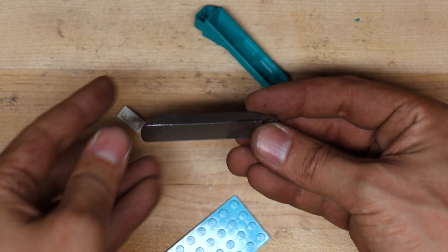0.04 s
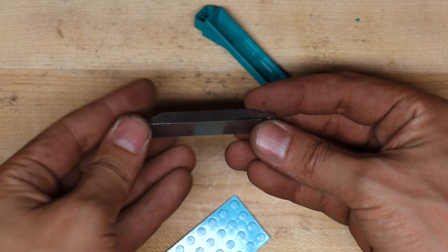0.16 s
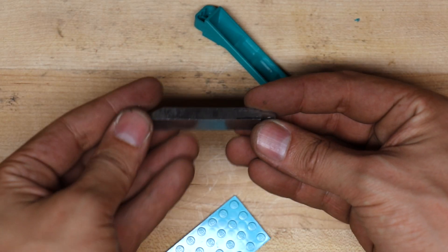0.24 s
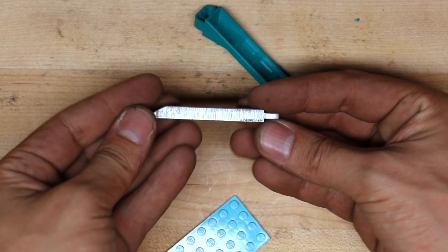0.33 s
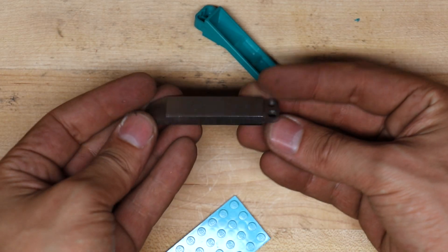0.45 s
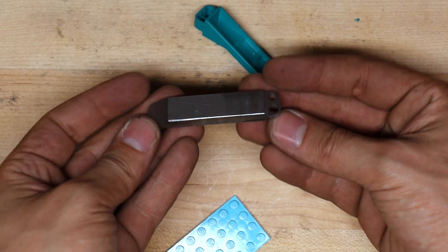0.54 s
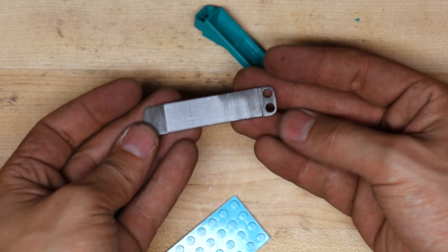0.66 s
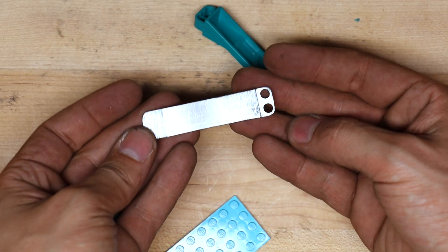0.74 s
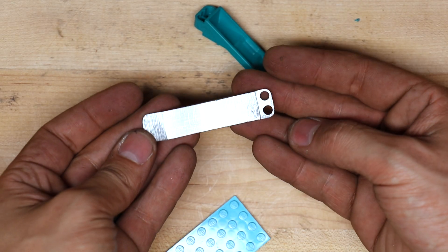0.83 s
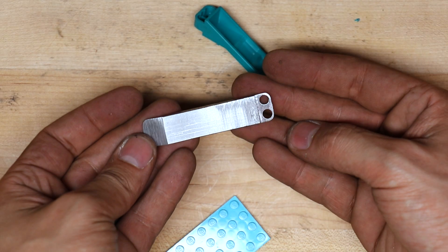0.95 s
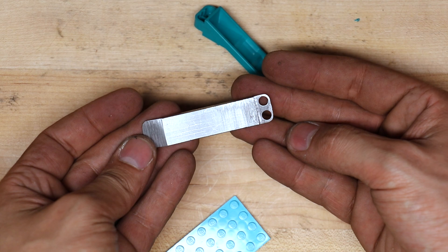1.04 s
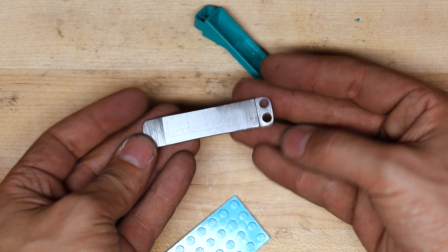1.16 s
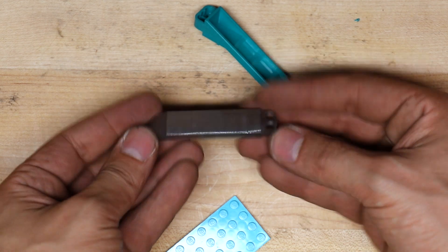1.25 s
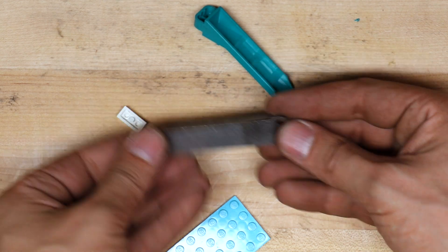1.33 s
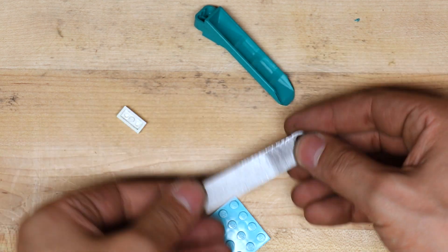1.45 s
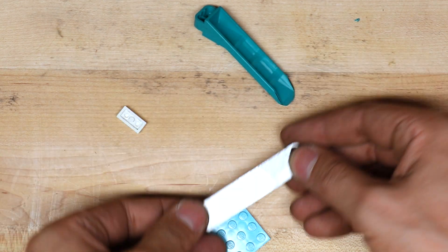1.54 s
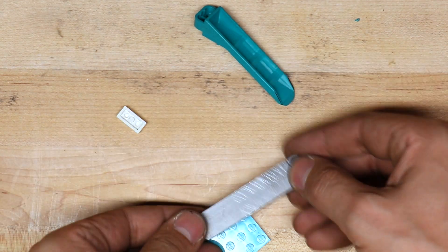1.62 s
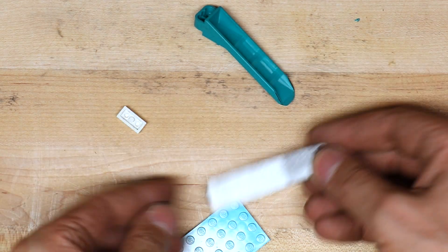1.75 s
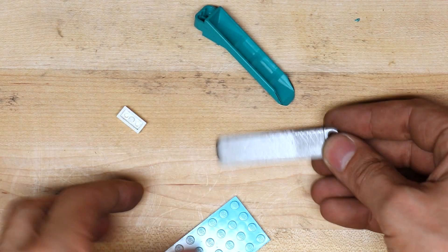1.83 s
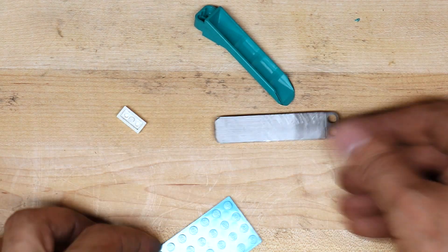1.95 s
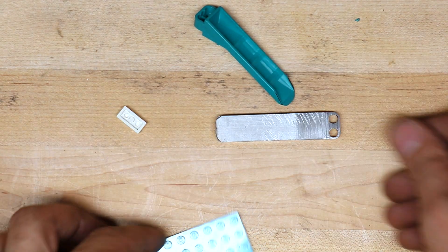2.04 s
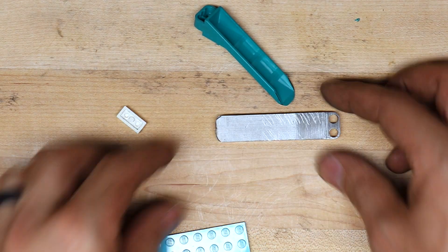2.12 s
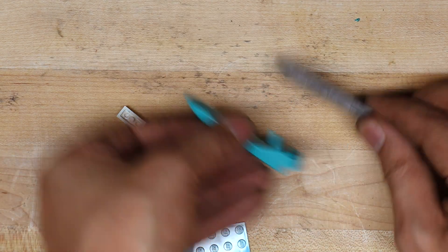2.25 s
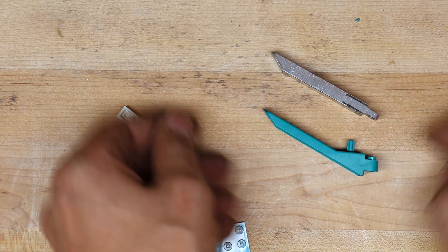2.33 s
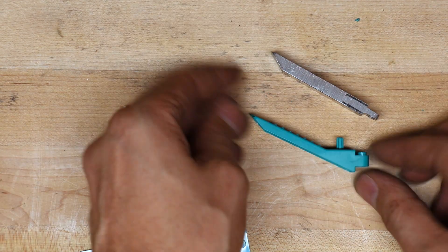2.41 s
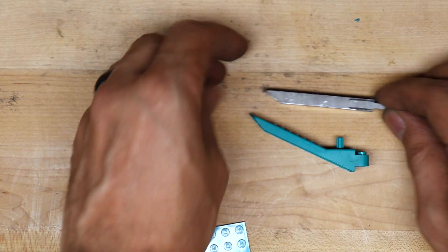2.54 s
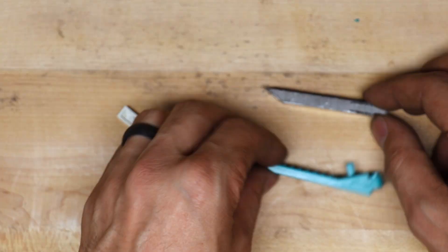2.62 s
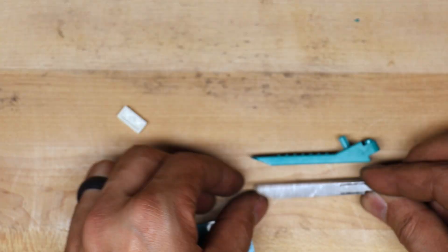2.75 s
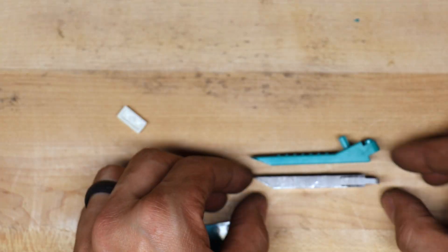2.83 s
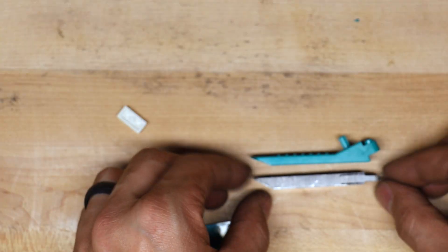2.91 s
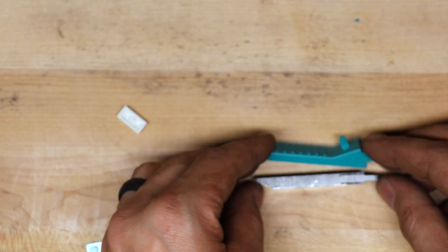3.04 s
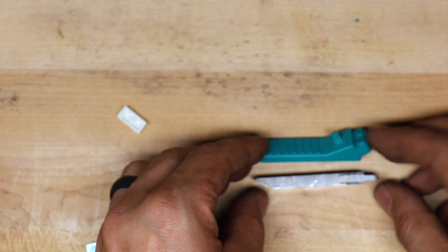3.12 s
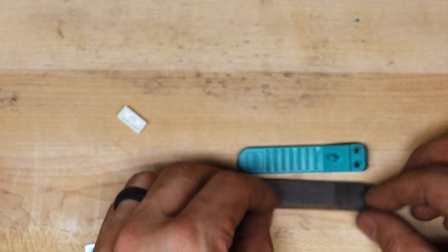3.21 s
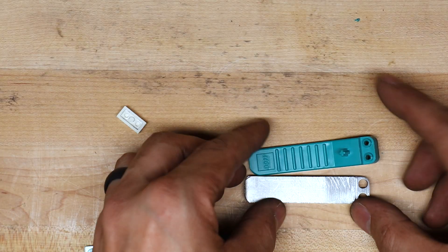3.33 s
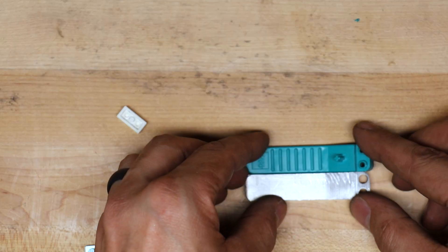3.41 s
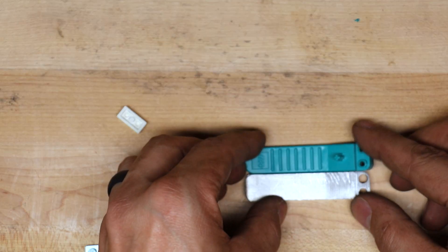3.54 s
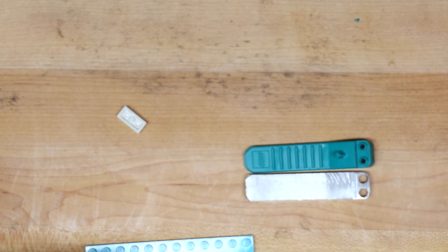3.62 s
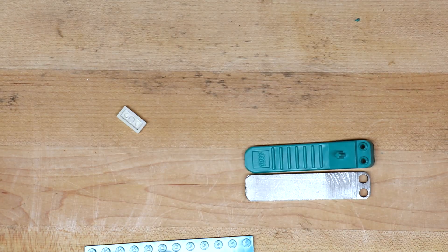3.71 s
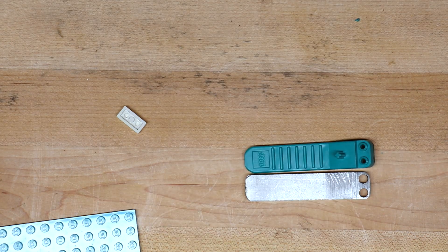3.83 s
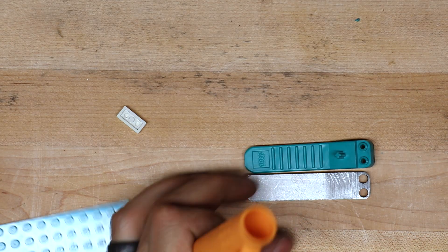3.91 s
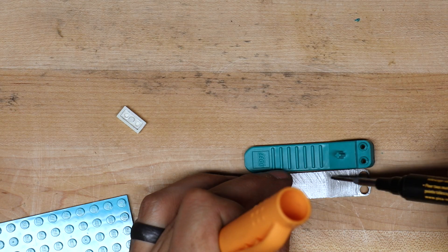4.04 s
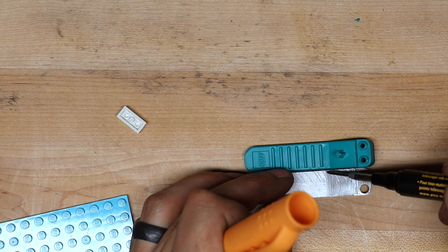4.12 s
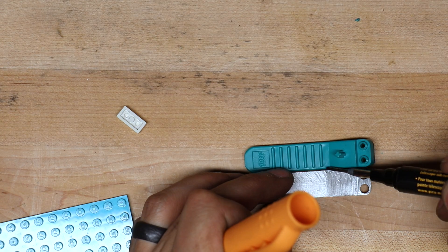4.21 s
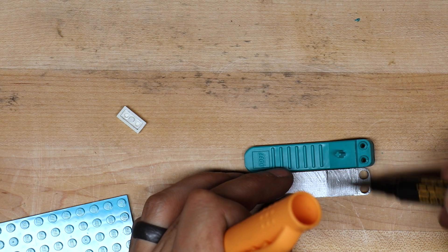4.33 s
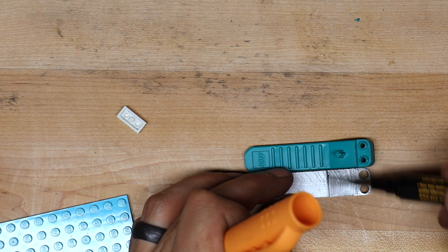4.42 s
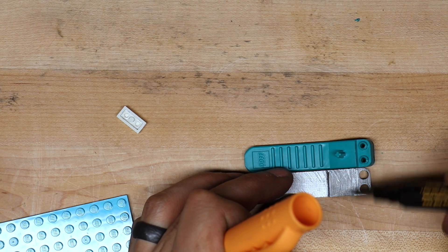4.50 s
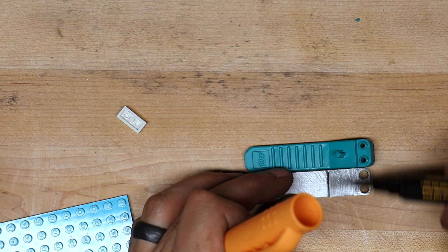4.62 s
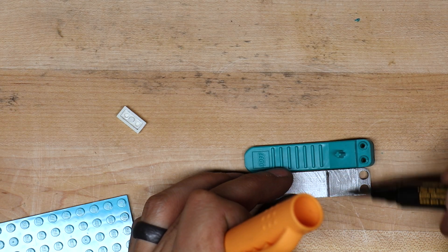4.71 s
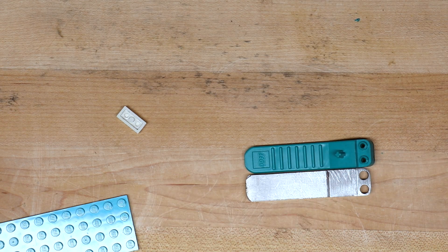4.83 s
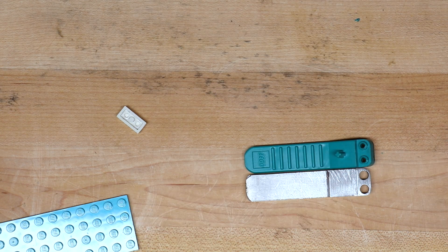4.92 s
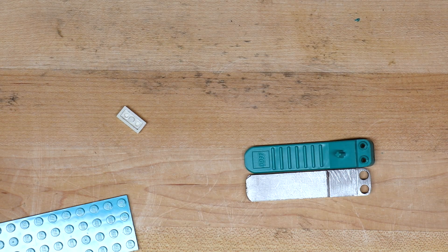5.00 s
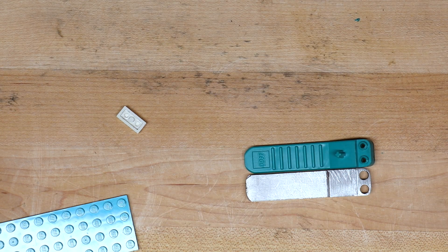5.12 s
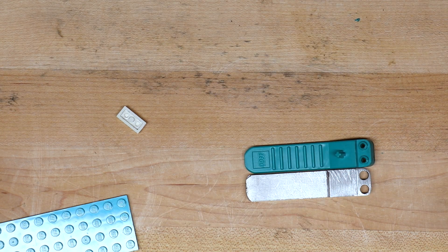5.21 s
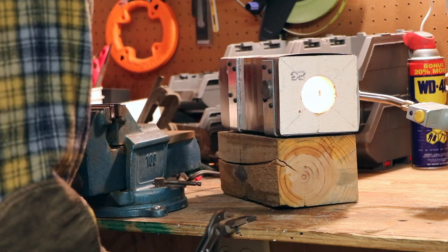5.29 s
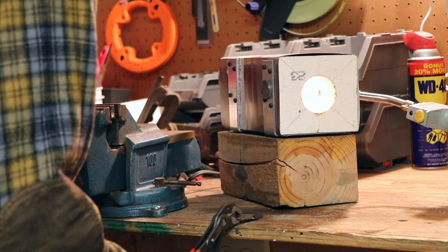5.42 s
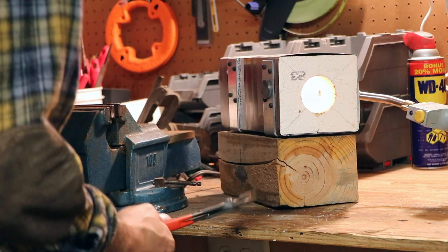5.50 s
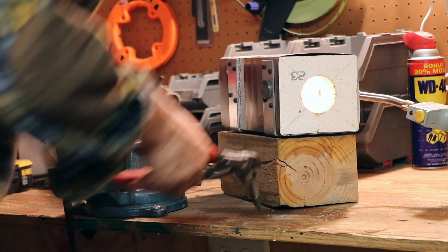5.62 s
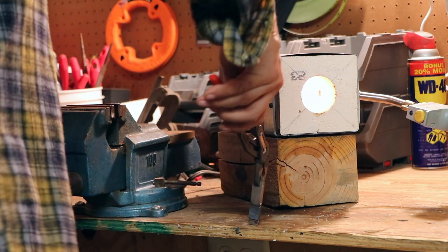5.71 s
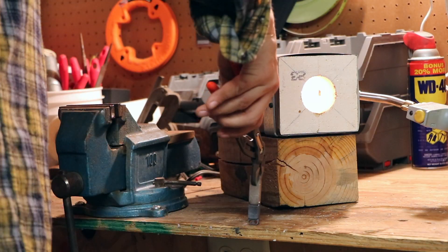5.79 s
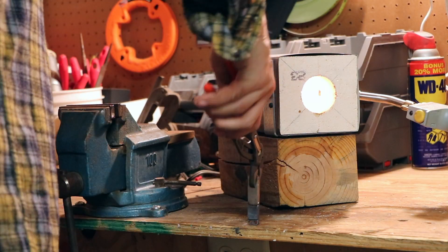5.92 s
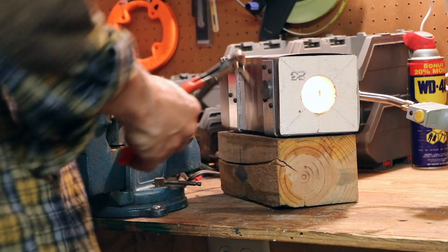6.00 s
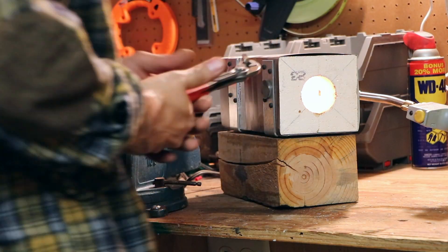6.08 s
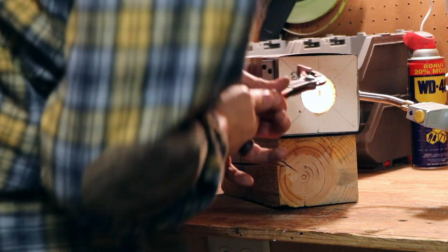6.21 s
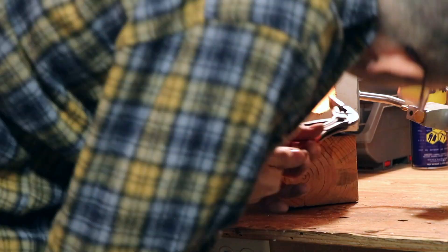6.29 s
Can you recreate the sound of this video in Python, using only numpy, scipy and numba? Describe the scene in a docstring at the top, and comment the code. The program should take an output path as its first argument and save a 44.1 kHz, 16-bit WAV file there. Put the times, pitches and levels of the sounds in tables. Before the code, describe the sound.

Over a soft fan, steel knocks on wood and small pieces click rapidly, before a gas forge's steady, hissing roar cuts in.

```python
"""A workshop, in three scenes. A fan hums while a steel strip is laid, then dropped, on a wooden bench.
At about five times the speed, the hum becomes a whine over quick taps, scrapes and marker strokes.
Last, also sped up, a small gas forge roars through its burner tube and chamber, and pliers knock once.
Impacts excite decaying modes; air flow and friction make broadband noise, coloured by resonance."""
import sys
import numpy as np
from scipy import signal
from scipy.fft import rfft, irfft, next_fast_len
from scipy.io import wavfile
from scipy.ndimage import uniform_filter1d
from numba import njit

SR = 44100
rng = np.random.default_rng(int(sys.argv[2]) if len(sys.argv) > 2 else 0)


def to_wav(s):
    """Save 16-bit WAV."""
    ch = np.atleast_2d(s).T  # columns
    pcm = np.round(np.clip(ch, -1, 1) * 32767)  # PCM
    wavfile.write(sys.argv[1], SR, pcm.astype(np.int16))


N = 280123
SPEED = 5.07  # time compression of the fast scenes
LEFT_LEAD_RAD, SIDES = -.23, np.array([[1], [-1]])
TAP_SIZE, TAP_PAN_DB = 4096, -4.5

# Shop sound field, normal and fast. Each row: frequency in Hz, left-right coherence from 0 to 1.
SHOP_COHERENCE = [(150, 1), (400, 0.79), (900, 0.32), (2000, 0.016)]
FAST_COHERENCE = [(150, 0.54), (600, 1), (1500, .9), (3500, 0.67), (5000, 0.076)]
# Bench-top modes before scaling. Each row: frequency in Hz, level in dB, T60 in seconds.
BENCH_MODES = [(253, 1, 0.17), (362, 3.5, 0.05), (437, -6, 0.39), (570, -33, 0.096), (704, 3.5, 0.26),
               (930, -1.5, 0.21), (1067, 1, 0.19), (1130, 3, 0.29), (1490, -42, .15), (1756, 3.5, 0.097),
               (2100, -8, 0.12), (2380, 3.5, 0.16), (2870, -19, 0.21), (3220, -3, 0.21), (3620, -15, .15)]


def undb(db):
    return 10 ** (np.asarray(db) / 20)


def level(x, db):
    return x * undb(db) / np.sqrt(np.mean(x ** 2))


def to_peak(x, db=0):
    return x * undb(db) / np.max(np.abs(x))


def along(table, hz):
    """Interpolation on a log-frequency axis."""
    f, v = np.transpose(table)
    return np.interp(np.log(np.maximum(hz, 1)), np.log(f), v)


def walk(rate, size=N):
    """Smoothed random steps, rate per second, with a spread near 1."""
    k = max(int(SR / rate), 1)
    steps = np.repeat(rng.standard_normal(size // k + 1), k)
    return 1.196 * uniform_filter1d(uniform_filter1d(steps, k), k)[:size]


def bump(hz, centre_hz, octaves):
    """Gaussian band in log frequency."""
    return np.exp(-2 * (np.log2(np.maximum(hz, 1) / centre_hz) / octaves) ** 2)


def resonance(hz, centre_hz, width_hz):
    """Lorentzian peak of a damped resonator."""
    return 1 / (1 + (2 * (hz - centre_hz) / width_hz) ** 2)


def band(x, low_hz, high_hz):
    """Butterworth band-pass."""
    edges = np.clip([low_hz, high_hz], 20, .47 * SR)
    return signal.sosfilt(signal.butter(2, edges, "band", fs=SR, output="sos"), x)


def stereo_noise(gain, coherence, size):
    """Partial coherence: a common and an opposed noise share one spectrum."""
    coherence = np.clip(coherence, 0, 1)
    mid, side = rfft(rng.standard_normal((2, size)))
    common = np.exp(.5j * LEFT_LEAD_RAD * SIDES) * mid * np.sqrt(1 + coherence)
    return irfft(gain * (common + SIDES * side * np.sqrt(1 - coherence)), size)


def ring(modes, size):
    """Free vibration: a sum of damped sinusoids, peak 1."""
    t = np.arange(size) / SR
    return to_peak(sum(undb(db - 60 * t / min(t60, .5)) * np.sin(2 * np.pi * hz * t)
                       for hz, db, t60 in modes))


def add(track, s, x):
    """Superposition from s seconds on."""
    i = int(s * SR)
    track[..., i:i + x.shape[-1]] += x[..., :N - i]


@njit
def compress(x, side, top, slope, attack, release):
    """Compression: gain falls as the side signal's envelope exceeds top."""
    y, envelope = np.empty_like(x), 0.
    for i in range(len(side)):
        rectified = abs(side[i])
        envelope += (rectified - envelope) * (attack if rectified > envelope else release)
        gain = (top / envelope) ** slope if envelope > top else 1.
        y[0, i], y[1, i] = gain * x[0, i], gain * x[1, i]
    return y


def gain_control(x, speed, top_db, slope):
    """Automatic gain control, driven mostly by the lows; its timing scales with speed."""
    side = signal.sosfilt(signal.butter(1, 700 * speed, fs=SR, output="sos"), x.mean(axis=0))
    return compress(x, side, undb(top_db), slope, speed / (.0045 * SR), speed / (.13 * SR))


def room(speed, coherence, onset_s, lift_db=0.):
    """Reverberation: octave bands decay exponentially; lift_db per octave brightens the treble."""
    # Decay at normal speed. Each row: frequency in Hz, T60 in seconds.
    decay = [(200, 0.4), (1000, 0.36), (4000, 0.21), (12000, 0.32)]
    # Colour of the echoes. Each row: frequency in Hz, gain in dB.
    tilt = [(100, -8), (250, -9), (2500, 10), (8000, -3), (16000, -11)]
    size, tail = 2 ** 15, 0
    hz, t = np.fft.rfftfreq(size, 1 / SR), np.arange(size) / SR
    colour = undb(along(tilt, hz) + lift_db * np.log2(np.clip(hz, 2500, 16000) / 2500))
    for centre in 100 * 2 ** np.arange(8):
        t60 = along(decay, centre / speed) / speed
        octave = stereo_noise(bump(hz, centre, .76) * colour, along(coherence, hz), size)
        tail += octave * undb(-60 * t / t60)
    tail *= np.clip(t * speed / onset_s, 0, 1)
    return tail / np.sqrt(np.sum(tail ** 2) / 2)


def air(spectrum, coherence, db, peaks=()):
    """Turbulence: the fan's broadband rush and the resonances it excites."""
    size = next_fast_len(N)
    hz = np.fft.rfftfreq(size, 1 / SR)
    likeness = along(coherence, hz)
    out = level(stereo_noise(undb(along(spectrum, hz)), likeness, size), db)
    for centre, width, rms_db in peaks:
        out += level(stereo_noise(resonance(hz, centre, width), likeness, size), rms_db)
    return out[:, :N]


def tones(table, swell_db, rate):
    """Random modulation: motor tones wander in pitch and strength."""
    out = np.zeros((2, N))
    for hz, db, wander_hz in table:
        phase = 2 * np.pi * (np.cumsum(hz + wander_hz * walk(rate)) / SR + rng.random())
        gain = np.sqrt(2) * undb(db + swell_db * np.sqrt(wander_hz) * walk(rate))
        out += gain * np.sin(phase + (LEFT_LEAD_RAD - hz / 10000) / 2 * SIDES)
    return out


def fan_hum():
    """Forced vibration of the motor adds tones to the flow noise."""
    # Air spectrum. Each row: frequency in Hz, relative density in dB.
    rush = [(15, -76), (25, -24), (64, -24), (89, -15), (123, -6.5), (145, -19), (170, -13), (317, -13.5),
            (1020, -22.5), (1440, -23), (1560, -21), (1700, -25.5), (4870, -41), (9840, -40), (16000, -51)]
    # Duct resonances. Each row: centre in Hz, width in Hz, rms level in dB.
    duct = [(40, 12, -70), (172.5, 15, -60.5), (211.4, 8.9, -62.5), (317.4, 38, -56.5), (409, 71, -68)]
    # Motor tones. Each row: frequency in Hz, rms level in dB, wander in Hz.
    hum = [(120.2, -43.5, .15), (535, -64, 5.0), (602, -70, 4.0), (1254, -70, 5.0), (1540, -64, 6.0),
           (2573, -78, 8.0)]
    return air(rush, SHOP_COHERENCE, -50, duct) + tones(hum, swell_db=.93, rate=10)


def fan_whine():
    """Time compression raises every frequency, so the hum becomes a whine."""
    # Air spectrum. Each row: frequency in Hz, relative density in dB.
    rush = [(12, -89), (20, -49), (138, -34), (198, -27), (248, -22), (485, -19), (607, -16.5),
            (678, -17.5), (1090, -14.5), (1190, -19), (1570, -12), (3440, -22), (7310, -24), (7950, -26),
            (16000, -39)]
    # Motor tones. Each row: frequency in Hz, rms level in dB, wander in Hz.
    whine = [(199.2, -68, 2.0), (543.7, -62.5, 1.5), (608.3, -44, .3), (872, -63.5, 3.0), (1088, -63, 1.5),
             (1523, -63, 3.0), (1588, -65, 5.0), (1820, -66, 6.0), (2724, -69, 6.0), (3052, -73, 10.0),
             (6272, -72, 10.0), (6401, -74, 10.0), (7811, -64, 25.0), (13205, -75, 40.0)]
    return air(rush, FAST_COHERENCE, -52) + tones(whine, swell_db=.77, rate=70)


def scrapes():
    """Sliding friction: grainy noise swells and stops under pieces and marker."""
    # Slides. Each row: start and length in seconds, level in dB, centre in Hz, width in octaves.
    slides = [(2.183, 0.087, -51, 3830, 1.2), (2.507, 0.019, -48, 4000, 1.2),
              (3.281, 0.037, -55, 3600, 0.3), (3.738, 0.023, -35.5, 7260, 1.05),
              (3.752, .036, -43.5, 11500, 1.2), (3.819, 0.19, -54, 9900, 3.2),
              (3.94, 0.013, -49, 12000, .6), (3.981, 0.031, -46, 9850, 2.3), (4.828, 0.14, -53, 6760, 2.4)]
    # Marker strokes across the strip, each a little firmer. Each entry: start in seconds.
    starts = [4.350, 4.397, 4.445, 4.503, 4.565, 4.626, 4.675, 4.725, 4.775]
    strokes = [(s, .015, -64 + 9 * (s - starts[0]), 13200, .68) for s in starts]
    size, out = 8192, np.zeros((2, N))
    hz, t = np.fft.rfftfreq(size, 1 / SR), np.arange(size) / SR
    for s, length, db, centre_hz, octaves in slides + strokes:
        rub = level(stereo_noise(bump(hz, centre_hz, octaves), .55, size), db)
        grain = undb(2.3 * walk(460, size))
        add(out, s, rub * grain * np.sin(np.pi * np.clip(t / length, 0, 1)) ** .73)
    return out


def chatter(decay_s):
    """Contact bounce: an impulse, then dying random spikes."""
    t = np.arange(TAP_SIZE) / SR
    spikes = rng.standard_normal(TAP_SIZE) ** 3 + 5.6 * (t == 0)
    return spikes * np.exp(-t / max(decay_s, 1e-4)) * (t < .02)


def click(force, db, centre_hz, octaves):
    """A struck piece filters the contact force to one band."""
    return to_peak(band(force, centre_hz / 2 ** (octaves / 2), centre_hz * 2 ** (octaves / 2)), db)


def in_room(direct, send, tail, pan_db=TAP_PAN_DB):
    """Direct sound plus reverberation by convolution."""
    echo = signal.fftconvolve(send[None], tail, axes=1)[:, :TAP_SIZE]
    return direct * undb(SIDES * pan_db / 2) + echo


def taps(tail):
    """Impacts drive the bench modes; firmer ones chatter longer and span a wider band."""
    # Steel and plastic. Each row: start in seconds, peak in dB, centre in Hz, knock in dB re click.
    hits = [(2.225, -33, 13000, -14), (2.2947, -8, 6500, -5.5), (2.323, -29, 10000, -11),
            (2.5566, -26.5, 7500, -2.5), (2.6817, -37, 13000, -7.5), (2.7838, -16.5, 6560, -8),
            (2.8123, -32, 8000, -4.5), (3.161, -39, 13000, -19), (3.1778, -15.5, 10600, -22),
            (3.2379, -18, 6100, -6.5), (3.337, -34, 13000, -21), (3.382, -37, 12000, -17),
            (3.394, -42, 11000, -14), (3.7040, -24.5, 12000, -5.5), (3.71, -29.5, 6150, -15),
            (3.832, -41, 9000, -7), (3.865, -24, 12000, -22), (3.875, -21.5, 9000, -12.5)]
    out = np.zeros((2, N))
    for s, db, centre_hz, knock_db in hits:
        force = chatter(.0029 * undb(.63 * knock_db))
        # Each spot on the top excites the modes in different strengths.
        spot = [(hz * SPEED, mode_db * .44 + 2.7 * rng.standard_normal(), .1 * t60 / SPEED)
                for hz, mode_db, t60 in BENCH_MODES]
        knock = band(signal.fftconvolve(force, ring(spot, TAP_SIZE))[:TAP_SIZE], 930, 10300)
        tap = click(force, db, centre_hz, max(3.1 + .2 * knock_db, 1)) + to_peak(knock, db + knock_db)
        add(out, s, in_room(tap, undb(3.5 + .02 * knock_db) * tap, tail))
    return out


def marker_cap(tail):
    """Cavity resonance: the hollow cap rings as it snaps on and settles."""
    # Each row: start in seconds, tick in dB, ring in dB, ring frequency in Hz.
    snaps = [(5.0065, -27, -18.5, 5240), (5.0140, -22.5, -24, 4650), (5.0503, -31, -45, 5300),
             (5.0854, -34, -54, 5000)]
    out = np.zeros((2, N))
    for s, tick_db, ring_db, ring_hz in snaps:
        tick = click(chatter(.0017), tick_db, centre_hz=11000, octaves=1.5)
        hollow = undb(ring_db) * band(ring([(ring_hz, 0, .016)], TAP_SIZE), 2600, 9000)
        add(out, s, in_room(tick + hollow, undb(-2.5) * (tick + .17 * hollow), tail))
    return out


def pliers(tail):
    """A single impulsive contact makes a midrange knock."""
    out = np.zeros((2, N))
    knock = click(chatter(1e-4), db=-19, centre_hz=1400, octaves=2)
    add(out, 5.71, in_room(knock, undb(-.5) * knock, tail, pan_db=0))
    return out


def steel_strip():
    """Impact excites bench and strip; the fingers damp the strip until they let go."""
    # Laid, then dropped. Each row: start in seconds, thud and crack in dB, crack top in Hz, ring in dB.
    drops = [(1.86, -14, -40, 4000, -43), (1.8663, -10.5, -14.5, 5200, -34.5), (1.883, -21, -45, 5000, -47),
             (1.9839, -8.5, -8.5, 11000, -14), (2.022, -27, -29, 7000, -38), (2.050, -21.5, -23, 4030, -41)]
    # Fingers on the strip. Each row: start in seconds, tick in dB, tick top in Hz, ring in dB.
    touches = [(1.190, -54, 11000, -52), (1.430, -55, 9000, -64), (1.6095, -30.5, 3000, -70),
               (1.760, -45.5, 14000, -71), (1.800, -50, 14100, -59)]
    # Strip modes. Each row: frequency in Hz, level in dB, T60 in seconds before damping.
    modes = [(9171, -7, .3), (9206, 0, .4), (9249, -15, .2), (10050, -20, .08), (11700, -30, .1)]
    size, let_go_s = 2 ** 14, 1.94
    t = np.arange(size) / SR
    blows, rings, ticks = np.zeros((3, N))

    def damped(table, share):
        return ring([(hz, db, share * t60) for hz, db, t60 in table], size)

    def crack(db, top_hz, decay_s):
        burst = rng.standard_normal(size) * np.exp(-t / decay_s)
        return to_peak(band(burst, top_hz / 3.2, top_hz), db)
    push = band(np.exp(-.5 * ((t - .0005) / .0001) ** 2), 410, 6800)
    thud = 1.2 * push + .5 * damped(BENCH_MODES, .25)  # short, dull wooden thud, the same for every hit
    held, free = damped(modes, .089), damped(modes, .69)
    for s, thud_db, crack_db, top_hz, ring_db in drops:
        add(blows, s, undb(thud_db) * thud + crack(crack_db, top_hz, decay_s=.0011))
        add(rings, s, undb(ring_db) * (held if s < let_go_s else free))
    for s, tick_db, top_hz, ring_db in touches:
        add(ticks, s, crack(tick_db, top_hz, decay_s=.0016))
        add(rings, s, undb(ring_db) * held)
    send = blows + .5 * rings + undb(-9) * ticks
    echo = signal.fftconvolve(send[None], room(.74, SHOP_COHERENCE, .00064), axes=1)[:, :N]
    return (blows + ticks) * undb(-1.5 * SIDES) + rings * undb([[-7], [3]]) + undb(-1) * echo


def forge(start_s):
    """A turbulent jet drives resonances that flutter independently; close echoes comb the roar."""
    # Jet spectrum. Each row: frequency in Hz, relative density in dB.
    jet = [(12, -82), (20, -50), (77, -48.5), (459, -26), (558, -9), (738, -19), (1660, -13), (1810, -15.5),
           (2530, -17), (4420, -1.5), (6010, -15), (11100, -16), (16000, -20)]
    # Chamber resonances, then burner-tube notches. Each row: centre in Hz, width in Hz, gain in dB.
    chamber = [(580, 37, -20.5), (1632, 127, -12.5), (2084, 390, -19), (2695, 65, -10), (3070, 33, -26),
               (3524, 120, -4.5), (3890, 33, -14), (4465, 107, 0.5), (4730, 39, -17), (5340, 530, -5.5),
               (6300, 160, -11), (6660, 260, -9), (7530, 55, -17), (7800, 110, -21), (9000, 170, -32),
               (9300, 55, -11), (10000, 56, -12), (10200, 71, -21), (11020, 510, -13.5), (12000, 70, -14),
               (13200, 260, -19), (13500, 250, -15), (14400, 110, -22), (15400, 72, -19)]
    notches = [(734, 47, -9), (1410, 80, -4), (1835, 116, -6.5), (2460, 170, -2), (3000, 90, -1),
               (3260, 130, -4), (3800, 55, -6), (8960, 150, -5)]
    # Balance. Each row: frequency in Hz, left minus right in dB.
    pan = [(500, 1), (3500, -3.5), (5500, -1), (9000, -4), (13500, -5), (15000, 0)]
    # The roar, then its echoes off bench and wall. Each row: frequency in Hz, coherence from 0 to 1.
    roar_coherence = [(500, 0.99), (2500, 0.95), (7000, 0.45), (14000, 0.35)]
    echo_coherence = [(500, 1), (2500, 0.96), (5000, 1), (8000, 0)]
    size = 2 ** 16
    hz, t = np.fft.rfftfreq(size, 1 / SR), np.arange(size) / SR
    coherence = along(roar_coherence, hz)
    roar = undb(-19) * stereo_noise(undb(along(jet, hz) + SIDES / 2 * along(pan, hz)), coherence, size)
    for centre, width, db in chamber:
        peak = undb(db - 15 + SIDES / 2 * along(pan, centre)) * resonance(hz, centre, width)
        roar += stereo_noise(peak, coherence, size) * undb(1.3 * walk(7.6, size))
    echoes = stereo_noise(1, along(echo_coherence, hz), size) * undb(-60 * t / .062)
    echoes /= np.sqrt(np.sum(echoes ** 2) / 2)
    roar += undb(-6.5) * irfft(rfft(roar.mean(axis=0)) * rfft(echoes), size)
    notch_db = sum(db * resonance(hz, centre, width) for centre, width, db in notches)
    roar = irfft(rfft(roar) * undb(notch_db), size)
    flutter_db = .4 * walk(3.4, size) + walk(40.45, size)
    out = tones([(184, -74.5, 2.8), (561, -50.5, 3.06), (835, -64, 3)], swell_db=.4, rate=12)
    add(out, start_s, level(roar, -26) * undb(flutter_db))
    return out


def scene():
    """Three scenes joined by linear cross-fades."""
    # Cross-fades. Each row: midpoint in seconds, length in seconds.
    fades = [(2.12, 0.011), (5.285, 0.022)]
    t = np.arange(N) / SR
    to_fast, to_forge = (np.clip((t - s) / length + .5, 0, 1) for s, length in fades)
    slow = gain_control(fan_hum() + steel_strip(), speed=1, top_db=-26, slope=.5)
    tail = room(SPEED, FAST_COHERENCE, .0014, lift_db=3.5)[:, :TAP_SIZE]
    handling = taps(tail) + marker_cap(tail) + pliers(tail)
    fast = gain_control(fan_whine() + scrapes() + handling, SPEED, top_db=-29, slope=.7)
    fire = forge(start_s=fades[1][0] - .1) + handling
    return slow * (1 - to_fast) + fast * to_fast * (1 - to_forge) + fire * to_forge


def record(dry):
    """Soft saturation rounds the peaks; two low-pass filters limit the bandwidth."""
    top = signal.ellip(8, .3, 40, 15680, fs=SR, output="sos")
    edge = signal.ellip(8, .3, 70, 16800, fs=SR, output="sos")
    return signal.sosfilt(np.vstack([top, edge]), .73 * np.tanh(dry / .68))


dry = scene()
out = record(dry)
to_wav(out)
```